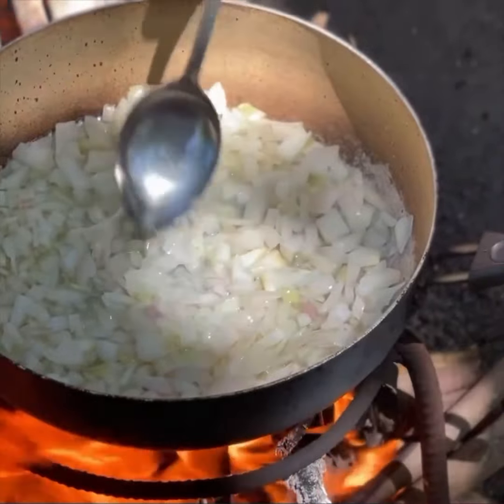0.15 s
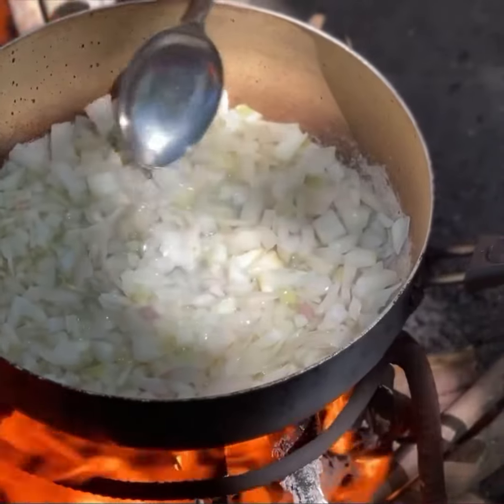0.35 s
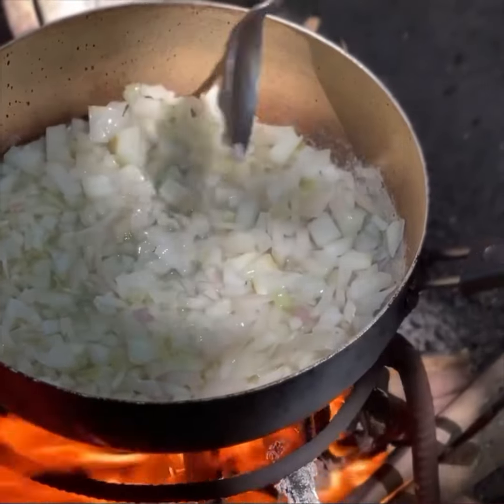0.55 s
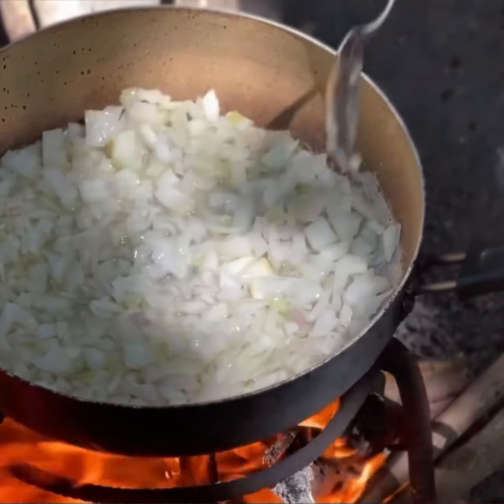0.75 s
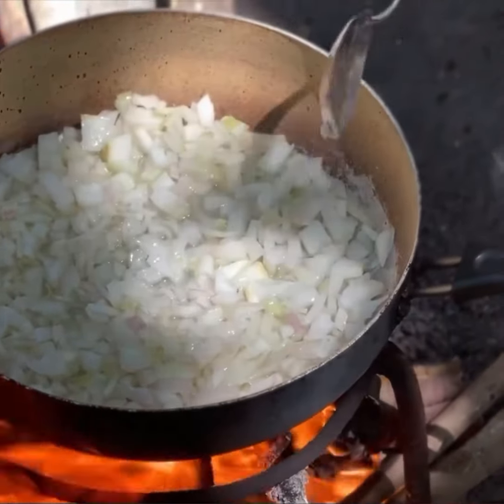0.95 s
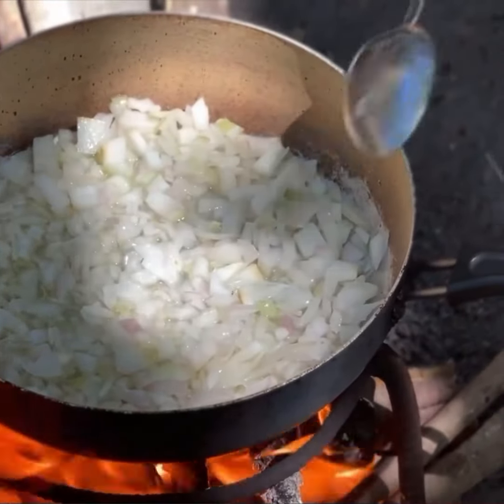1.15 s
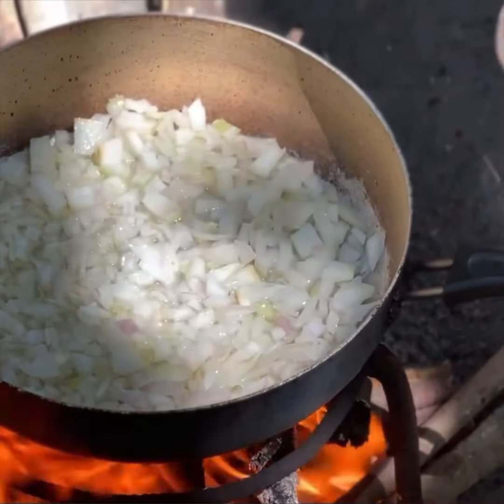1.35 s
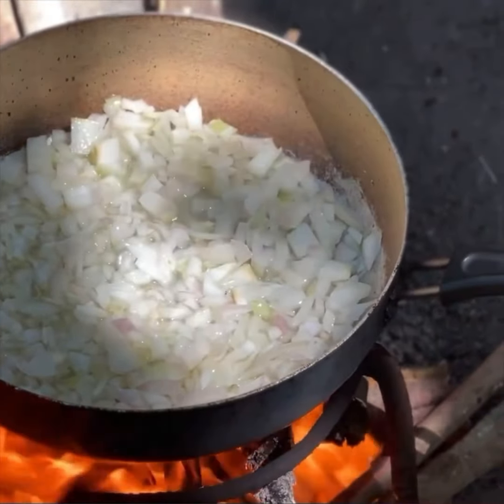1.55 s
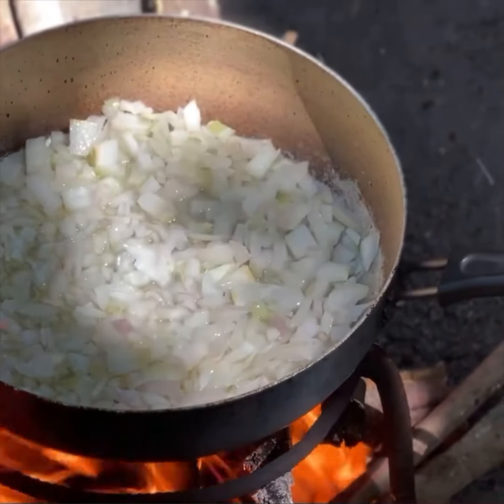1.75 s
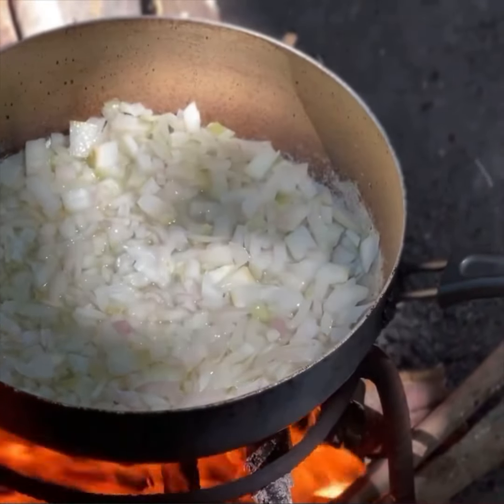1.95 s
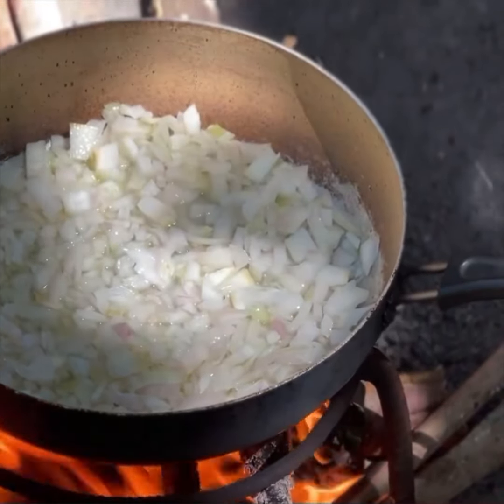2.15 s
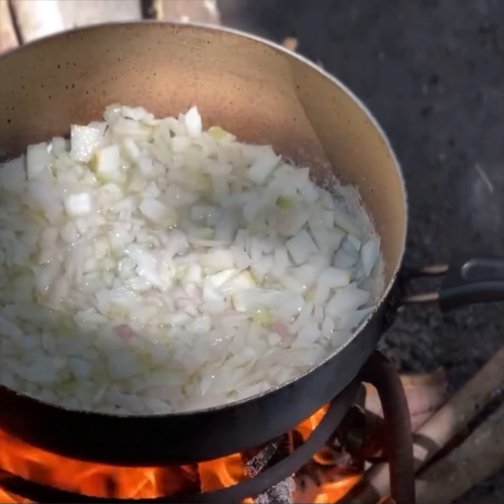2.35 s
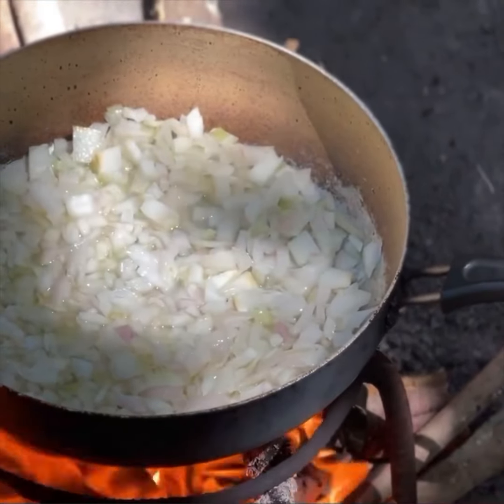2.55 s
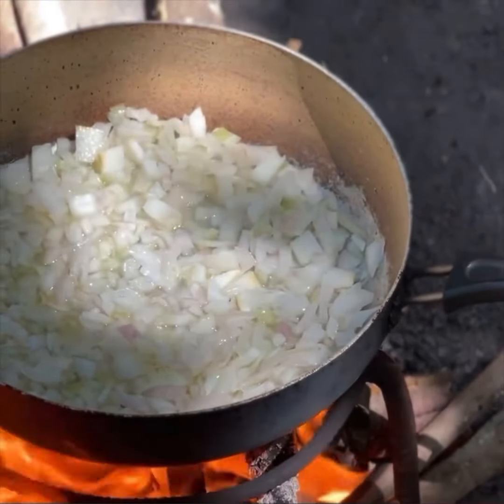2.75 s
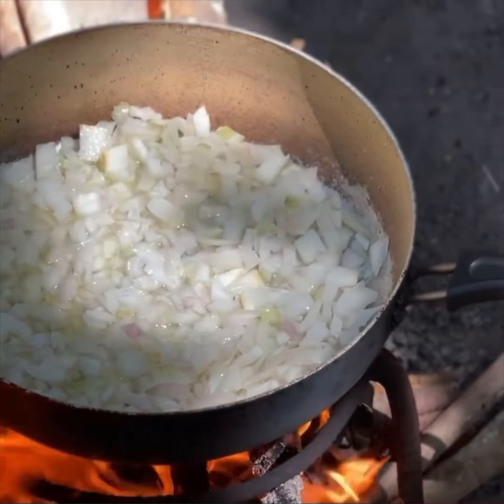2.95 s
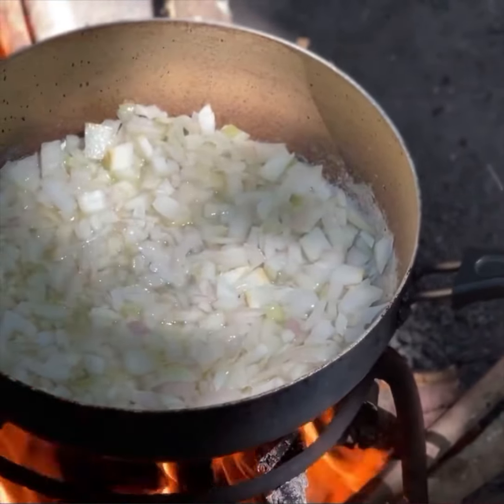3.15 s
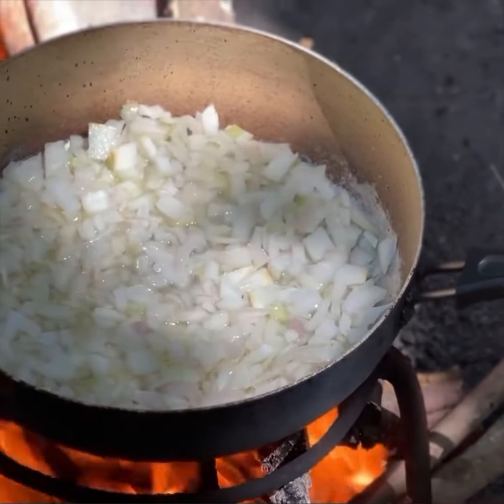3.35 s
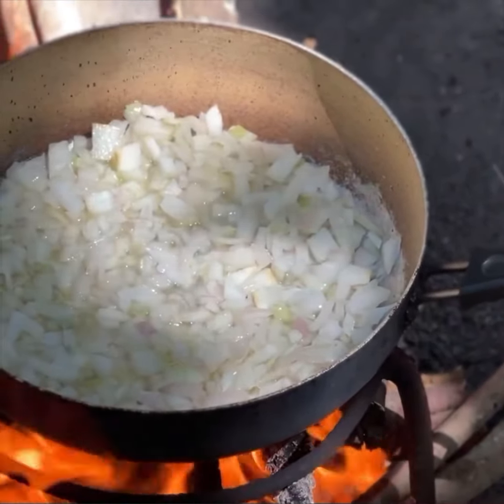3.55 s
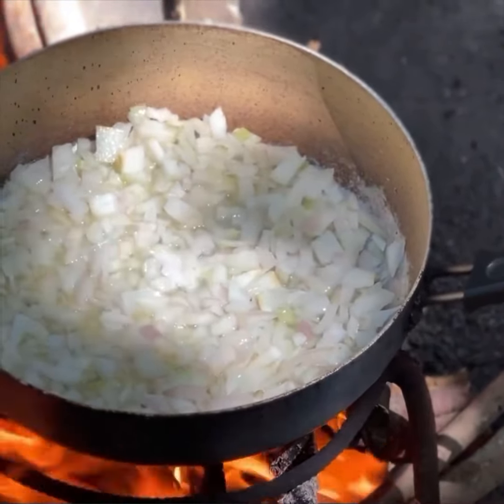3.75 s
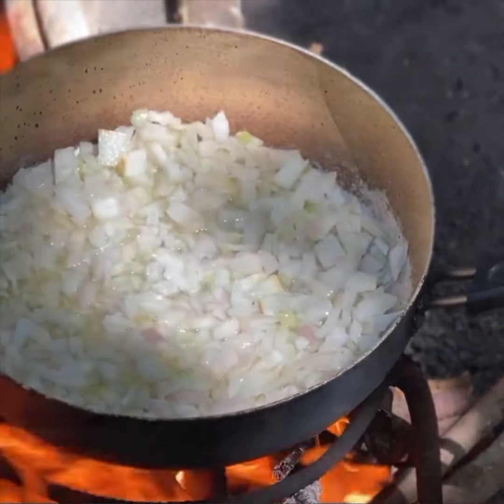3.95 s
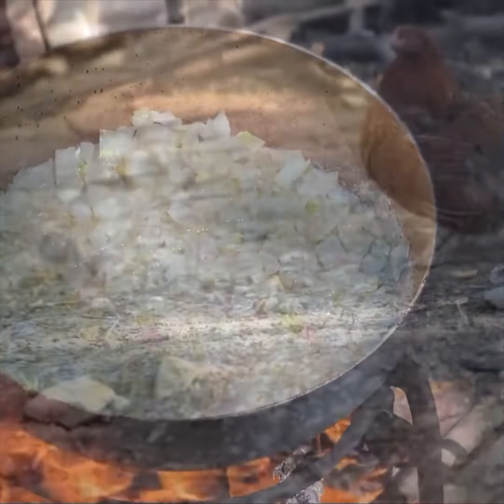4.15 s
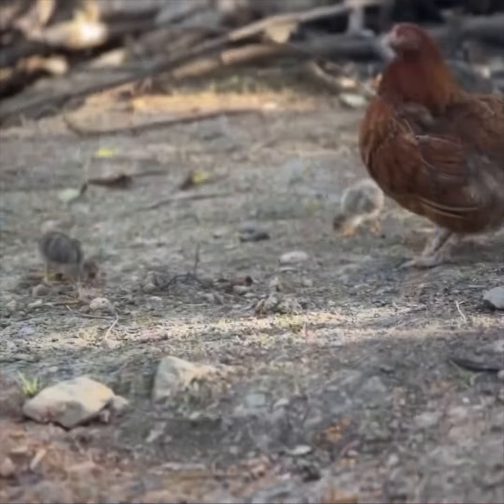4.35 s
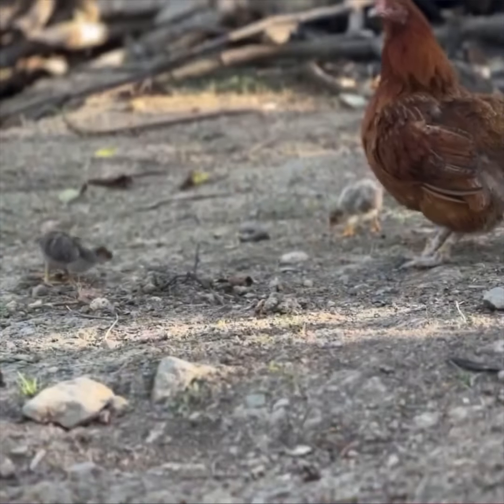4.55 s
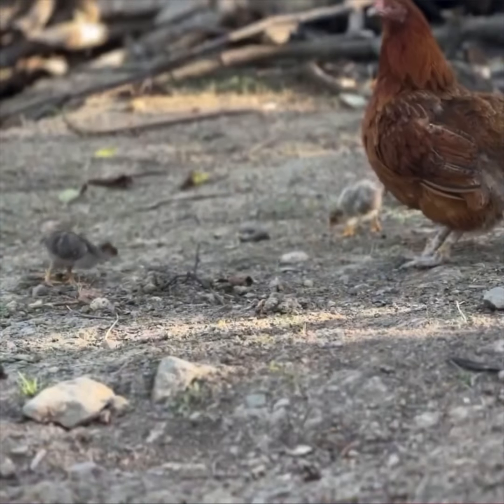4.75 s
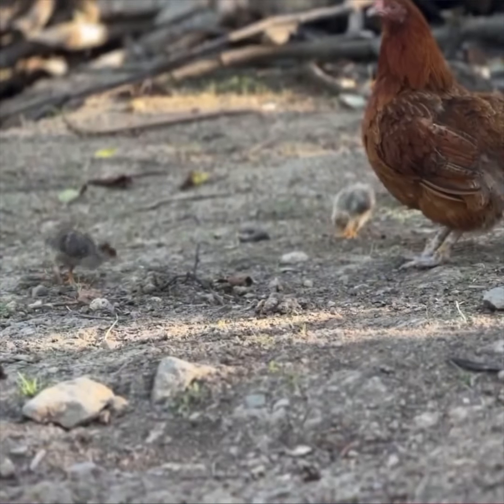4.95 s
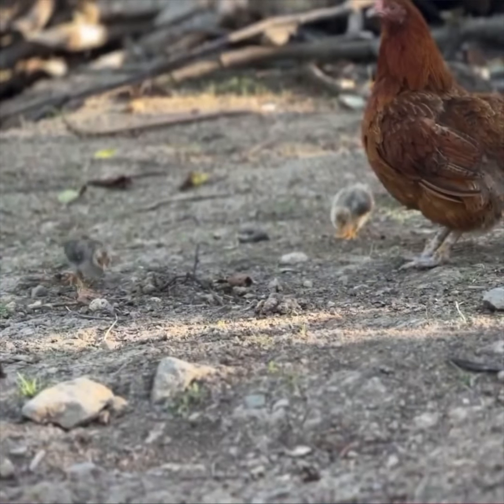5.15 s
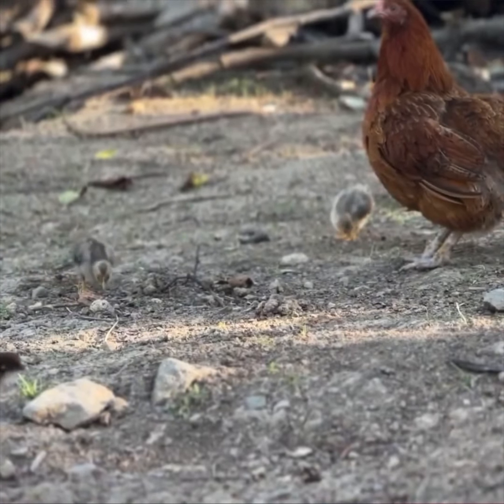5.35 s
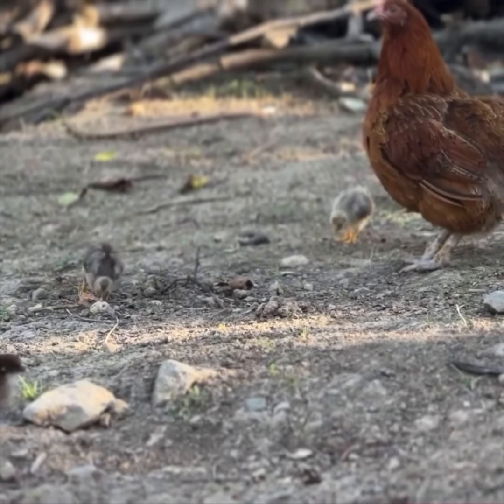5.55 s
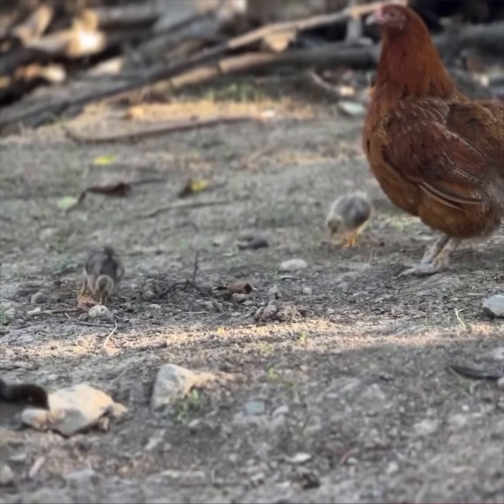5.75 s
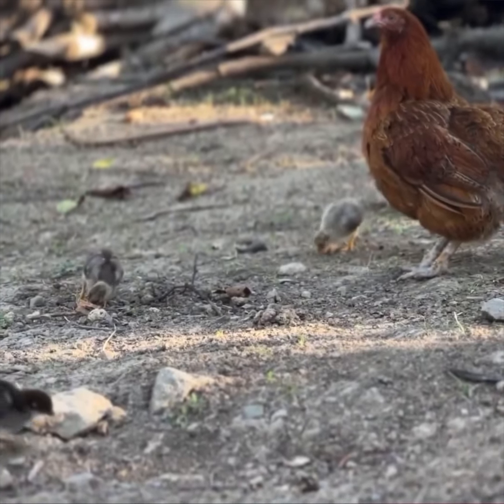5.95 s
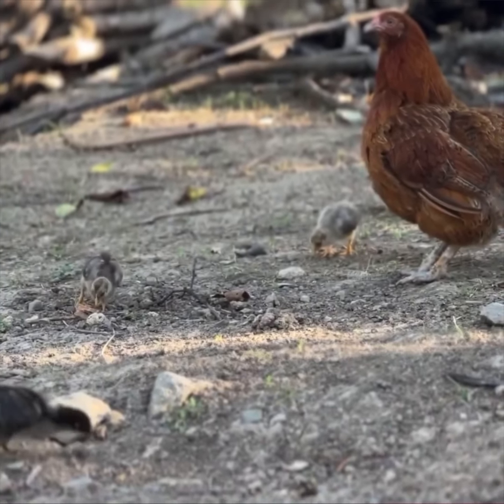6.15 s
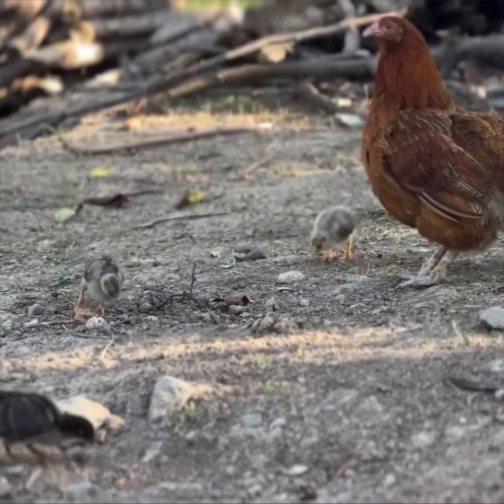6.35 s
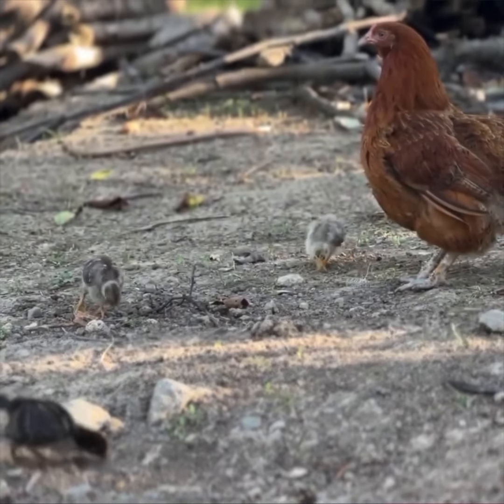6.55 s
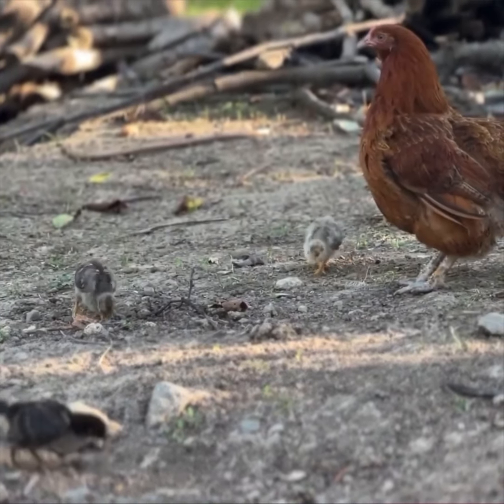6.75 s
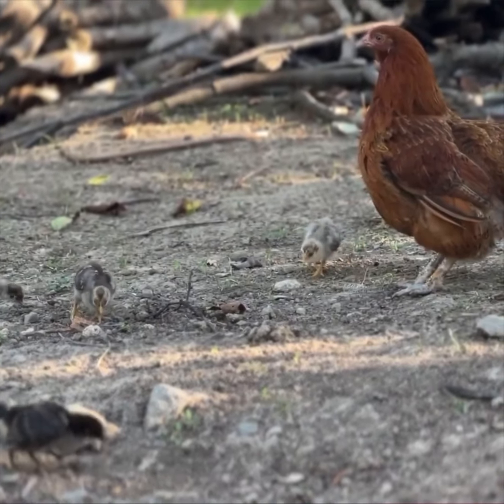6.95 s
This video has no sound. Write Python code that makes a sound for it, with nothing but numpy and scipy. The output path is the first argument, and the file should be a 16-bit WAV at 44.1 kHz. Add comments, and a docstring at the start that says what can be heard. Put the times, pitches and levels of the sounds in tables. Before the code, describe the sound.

Onions sizzle over a fire with spoon knocks and wind on the microphone, then a sudden change to a quiet yard with peeping chicks.

```python
"""Onion frying outdoors, then a yard with chicks.

Chopped onion sizzles over a wood fire as steam bubbles burst in the fat; air buffets the microphone.
A steel spoon is knocked clean on the rim, the pan rocks on its stand, the spoon is laid down and rings.
The scene changes abruptly to a quiet yard: chicks whistle short peeps, a low croak like a hen's
rattles once, a high hiss hangs behind."""
import sys
import numpy as np
from scipy import signal
from scipy.fft import rfft, irfft, next_fast_len
from scipy.io import wavfile
from scipy.ndimage import uniform_filter1d

SR = 44100
rng = np.random.default_rng(int(sys.argv[2]) if len(sys.argv) > 2 else 0)


def dump_mix(stems):
    """Bounce the given channels to the path in sys.argv[1] as a 16-bit WAV at rate SR."""
    frames = np.atleast_2d(stems).T  # one column per channel
    limited = np.clip(frames, -1, 1)  # hard clip at full scale
    pcm = np.round(limited * 32767).astype(np.int16)
    wavfile.write(sys.argv[1], SR, pcm)


N = 313110
TIME_S = np.arange(N) / SR
EVENT_TIME_S = TIME_S[:SR // 2]
SCENE_CHANGE_S = 4.193

# Spectral shapes: freq_hz, density_db
SIZZLE_SPECTRUM = [(1760, -31), (3000, -15.5), (3550, -7), (4100, -5.5), (5100, -2.5), (5450, -1),
                   (7700, -2.1), (8850, 0), (9900, -6.5), (10400, -5), (11700, -6), (12300, -11),
                   (13500, -12.5), (15600, -9.5), (16000, -7)]
SPATTER_SPECTRUM = [(410, -34), (700, -12.5), (973, -10), (1620, -1.5), (2770, -2.5), (3600, -1.5),
                    (4280, -7.5), (5000, -8), (6500, -20.5), (11000, -120)]
KNOCK_SPECTRUM = [(150, 2), (400, 3.5), (900, 0), (1500, 2), (2300, -5.5), (3800, -5.5), (5800, -1.5),
                  (8500, -4), (11000, -19), (16000, -17)]
CLINK_SPECTRUM = [(300, -11.5), (620, -7), (760, -12), (970, 0), (1090, -6), (1230, -1), (1480, -13),
                  (1780, 4), (2050, -7), (2350, 3.5), (2700, -3.5), (4600, -14), (8000, -36), (16000, -35)]
BUFFET_SPECTRUM = [(22, -15), (40, -3), (70, 2.5), (120, -5.5), (200, -14), (330, -27), (700, -46)]
FLAME_SPECTRUM = [(76, -21.5), (130, 0), (167, -1.5), (279, -1.5), (469, -8), (754, -14.5), (1200, -14),
                  (1560, -32), (2640, -120)]
THROAT_SPECTRUM = [(450, -11), (750, -6), (1000, 1.5), (1300, -11), (1700, -7), (2500, -18), (4000, -32)]
AIR_SPECTRUM = [(71, -23.5), (120, -1), (246, -6), (278, -10), (341, -7), (385, -12.5), (592, -13.5),
                (1460, -20.5), (2480, -19.5), (2930, -20.5), (3660, -24), (5410, -29), (7500, -28.5),
                (9210, -34.5), (16000, -46)]
HISS_SPECTRUM = [(6200, -39), (6800, -3.5), (7400, 5), (7800, 0.5), (8100, -14), (8700, -11), (9300, -36)]
# Stereo widths: freq_hz, side_gain_db
PAN_WIDTH = [(200, -18.5), (900, -8.5), (1400, -46), (2400, -63), (3500, -51), (4600, -68), (8200, -77),
             (9100, -24), (9800, 8), (10600, -40), (12000, -57), (15500, -40)]
YARD_WIDTH = [(150, -14.5), (500, -5), (1300, -0.5), (2500, -8), (3500, -11), (4500, -46), (7400, -43),
              (14000, -10)]

# Juice meeting hot fat: peak_s, lift_db
FLARES = [(.48, 1), (1.24, 3), (2.29, 1.5), (3.25, 1.3), (4.05, 1.5)]
# Bursting drops of fat: start_s, level_db, centre_hz
POPS = [(0.748, -5, 6000), (1.43, -0.5, 7000), (2.865, -7, 5000), (2.9545, -7, 7000), (3.445, 1.5, 7000),
        (3.775, -1, 8000)]
# Spoon on the rim: start_s, strength_db, t60_s
KNOCKS = [(0.8042, 6.5, 0.038), (0.8096, -7.5, 0.024), (1.038, 3.5, 0.06)]
# Modes of spoon and rim together: freq_hz, gain_db, t60_s
RIM_MODES = [(607, -11, 0.15), (1658, -13.5, 0.071), (2700, -7, 0.038), (4060, -34, 0.084),
             (4460, -3.5, 0.025), (4940, -1.5, 0.022), (5600, -27, 0.062), (6040, -3, 0.034),
             (7300, -22, 0.065), (8690, -5, 0.027), (8480, -8, 0.037)]
# Spoon laid down: start_s, impact_db, ring_db
CLINKS = [(1.960, -3.5, -3.5), (1.992, -10.5, -6.5), (2.073, -18, -23), (2.081, -18, -25),
          (2.324, -26, -22)]
# Modes of the free spoon: freq_hz, gain_db, t60_s
SPOON_MODES = [(1010, -32.5, 0.63), (1790, -29, 0.17), (2080, -30, 0.22), (2372, -42, 0.11),
               (2995, -13.5, 0.18), (3500, -29, 0.19), (4130, -23, 0.12)]
# Pan on its stand, later things on the ground: start_s, level_db, pitch_hz
BUMPS = [(0.737, -3.5, 310), (0.838, -1.5, 633), (0.8478, 7, 470), (0.861, 2, 538), (0.875, -6, 537),
         (1.063, 0.5, 417), (1.071, -2, 587), (1.078, 0, 497), (4.376, -19, 606), (5.833, -24.5, 606)]
# Short gritty sounds, scrapes and one light peck-like tap: start_s, length_s, level_db, centre_hz, width_hz
GRITTY_SOUNDS = [(0.731, 0.018, -19.5, 1520, 980), (2.115, 0.15, -35, 877, 190),
                 (5.831, .009, -41, 750, 900)]

# Light breeze: time_s, strength_db
BREEZE = [(0, -32), (1.75, -36.5), (3.0, -31), (3.7, -35.5), (4.5, -37.5), (5.0, -35), (5.45, -40.5),
          (6.1, -48), (6.6, -34), (7.1, -30.5)]
# Gusts on top of it: start_s, hold_s, strength_db, eddy_hz
GUSTS = [(.11, 0.06, -30, 119), (.59, 0.42, -30.5, 111), (1.93, 0.17, -29.5, 150), (2.13, 0.14, -14, 130),
         (2.33, .11, -17, 110), (2.69, 0.21, -21.5, 210), (3.28, 0.052, -24, 150), (3.97, .18, -20.5, 320),
         (5.38, 0.071, -29.5, 100), (5.575, .04, -25.5, 150), (6.72, .36, -35, 170)]
# Strong single eddies: start_s, level_db, start_hz
EDDIES = [(1.083, -17, 103), (1.45, -15, 148), (2.059, -15, 170), (2.129, -7.5, 185.4), (2.246, -5.5, 105),
          (2.538, -18, 228), (5.601, -20, 175)]
EDDY_S = 0.0343

# Near chicks: start_s, length_s, start_hz, end_hz, level_db
PEEPS = [(4.23, 0.032, 2700, 3630, -42), (4.245, 0.05, 2960, 2610, -33.5),
         (4.835, 0.047, 3300, 2620, -36.5), (4.982, 0.045, 3200, 2600, -37), (5.206, .04, 2750, 3670, -41),
         (6.017, 0.042, 3100, 2610, -36.5), (6.252, 0.029, 2650, 3520, -40), (6.662, .026, 3100, 3600, -47),
         (6.749, 0.04, 3200, 2700, -40), (6.855, .054, 3380, 2660, -36.5)]
# Low rattle: start_s, length_s, level_db
CROAK = (4.379, 0.087, -41)
# Distant tone: start_s, length_s, pitch_hz, level_db
FAR_TONE = (0.015, .125, 994, -38.5)


def frying():
    """Fine steam bursts hiss, bubbles fizz; coarser bursts between the onion pieces spatter lower."""
    sizzle_db, spatter_db = heat()
    seething = from_db(.45 * drift(6) + .35 * drift(22))
    fizz = bubbles(per_s=6500, spread_db=2.8, q=24, pitches=56)
    spits = from_db(-17) * bursts(per_s=160, spread_db=2)
    fine = rms_one(fizz + spits + from_db(2) * bursts(per_s=22000, spread_db=2.4))
    coarse = rms_one(fizz + from_db(3) * bursts(per_s=9000, spread_db=2))
    sizzle = from_db(sizzle_db) * colour(fine, SIZZLE_SPECTRUM)
    spatter = from_db(spatter_db) * colour(coarse, SPATTER_SPECTRUM)
    return stereo(seething * (sizzle + spatter), PAN_WIDTH)


def heat(sizzle_db_per_s=0.82, spatter_db_per_s=0.67, flare_width_s=0.056):
    """The pan heats up: sizzle and spatter climb steadily, with brief flares."""
    flare_db = sum(db * np.exp(-((TIME_S - peak_s) / flare_width_s) ** 2) for peak_s, db in FLARES)
    sizzle_db = -26.5 + sizzle_db_per_s * TIME_S + flare_db
    spatter_db = -35 + spatter_db_per_s * TIME_S + 0.3 * flare_db
    return sizzle_db, spatter_db


def bubbles(per_s, spread_db, q, pitches):
    """Each burst rings at one of many pitches; each pitch wavers in level."""
    grains = bursts(per_s, spread_db)
    pitch_index = rng.integers(0, pitches, N)
    out = 0
    for k, hz in enumerate(np.geomspace(1000, 16000, pitches)):
        ring = resonance(grains * (pitch_index == k) + 1e-18, hz, hz / q)
        out = out + ring * from_db(1.1 * drift(22))
    return rms_one(out)


def pops():
    """Larger drops of fat burst with a tick."""
    out = np.zeros(N)
    for start_s, db, hz in POPS:
        tick = rng.standard_normal(SR // 2) * decay(t60_s=0.0025)
        add(out, start_s, from_db(db) * resonance(tick, hz, width_hz=4500))
    return out


def spoon_knocks():
    """Held against the rim, the spoon clacks and is soon damped."""
    clack, ring = np.zeros((2, N))
    for start_s, db, t60_s in KNOCKS:
        envelope = decay(t60_s) + from_db(-16) * decay(0.19)
        add(clack, start_s, from_db(db - 2) * rng.standard_normal(SR // 2) * envelope)
        for hz, mode_db, mode_t60_s in RIM_MODES:
            gain = from_db(db + mode_db + rng.normal(0, 3.3)) * rng.choice([-1, 1])
            add(ring, start_s, gain * np.sin(2 * np.pi * hz * EVENT_TIME_S) * decay(mode_t60_s))
    return colour(clack, KNOCK_SPECTRUM) + ring


def spoon_clinks():
    """Laid down, the spoon bounces; each bounce tops up its ringing in phase."""
    clink, ring = np.zeros((2, N))
    envelope = decay(0.022) + from_db(-20.5) * decay(0.4)
    for start_s, impact_db, ring_db in CLINKS:
        add(clink, start_s, from_db(impact_db) * rng.standard_normal(SR // 2) * envelope)
        for hz, mode_db, t60_s in SPOON_MODES:
            mode = np.sin(2 * np.pi * hz * (start_s + EVENT_TIME_S))
            add(ring, start_s, from_db(ring_db + mode_db) * mode * decay(t60_s))
    return colour(clink, CLINK_SPECTRUM) + ring


def bumps():
    """A soft contact swells over a cycle and rings briefly in a low mode and a weaker upper one."""
    out = np.zeros(N)
    for start_s, db, hz in BUMPS:
        phase = 2 * np.pi * hz * EVENT_TIME_S
        modes = np.sin(phase) + 0.17 * np.sin(1.55 * phase)
        attack = 1 - np.exp(-2 * hz * EVENT_TIME_S)
        add(out, start_s, from_db(db) * modes * attack * decay(t60_s=0.023))
    return out


def gritty_sounds(flicker_db=1):
    """Scrapes and one light peck-like tap: uneven grains excite one broad resonance."""
    out = np.zeros(N)
    grains = bursts(per_s=8200, spread_db=3)[0] * from_db(flicker_db * drift(56))
    for start_s, length_s, db, hz, width_hz in GRITTY_SOUNDS:
        first, count = int(start_s * SR), int(length_s * SR)
        grit = grains[first:first + count]
        for _ in range(2):
            grit = resonance(grit, hz, 0.73 * width_hz)
        swell = np.sin(np.linspace(0, np.pi, count))
        add(out, start_s, from_db(db) * rms_one(grit * swell))
    return out


def wind():
    """Lumpy low turbulence on the microphone swells with each gust."""
    airflow_db = airflow(flutter_db=2.6)
    lumps = colour(bursts(per_s=330, spread_db=4), BUFFET_SPECTRUM)
    lumps = signal.sosfilt(signal.butter(4, 42, "high", fs=SR, output="sos"), lumps)
    lumps = stereo(lumps, [(50, -15), (200, -13)])
    running_rms = np.sqrt(uniform_filter1d(np.mean(lumps ** 2, axis=0), size=3500) + 1e-9)
    return from_db(airflow_db - 2) * lumps / running_rms


def airflow(flutter_db, rise_db_per_s=172, fall_db_per_s=262):
    """Air strength in dB: gusts rise, hold and fall on top of the breeze; the sum flutters."""
    power = from_db(along_time(BREEZE)) ** 2
    for start_s, hold_s, db, _ in GUSTS:
        before_s = np.maximum(start_s - TIME_S, 0)
        after_s = np.maximum(TIME_S - start_s - hold_s, 0)
        power += from_db(db - rise_db_per_s * before_s - fall_db_per_s * after_s) ** 2
    return 10 * np.log10(power) + flutter_db * drift(14)


def eddies():
    """A passing eddy thumps on the microphone and falls in pitch."""
    out = np.zeros(N)
    progress = np.linspace(0, 1, int(EDDY_S * SR))
    for start_s, db, start_hz in EDDIES + shed_eddies():
        phase = 2 * np.pi * np.cumsum(start_hz * np.exp(-.9 * progress)) / SR
        add(out, start_s, from_db(db) * np.sin(phase) * np.sin(np.pi * progress))
    return out


def shed_eddies(per_s=22, relative_db=-3):
    """A gust sheds a loose train of smaller eddies while it holds; rows as in EDDIES."""
    rows = []
    for start_s, hold_s, db, hz in GUSTS:
        jitter = rng.uniform(-1, 1, (32, 3))
        times_s = np.arange(start_s, start_s + hold_s - EDDY_S / 2, 1 / per_s)
        for at_s, (late, strong, high) in zip(times_s, jitter):
            rows.append((at_s + late * EDDY_S / 2, db + relative_db + 3 * strong, hz * 2 ** (.34 * high)))
    return rows


def flames():
    """The wood fire flutters under the pan."""
    return from_db(-37.5 + 1.86 * drift(6.2)) * stereo(colour(noise(), FLAME_SPECTRUM), PAN_WIDTH)


def chicks(full_effort_db=-33.5, octave_loss_db_per_db=6.4):
    """Peeps slide up or down; a forced one gains an octave overtone."""
    out = np.zeros(N)
    for start_s, length_s, start_hz, end_hz, db in PEEPS + far_peeps():
        octave_db = -9 - octave_loss_db_per_db * max(full_effort_db - db, 0)
        add(out, start_s, from_db(db) * whistle(length_s, start_hz, end_hz, octave_db))
    return out


def far_peeps(per_s=3, length_s=.035, pitch_hz=3100, level_db=-54):
    """Faint falling peeps scattered through the yard; rows as in PEEPS."""
    jitter = rng.uniform(-1, 1, (24, 3))
    times_s = np.arange(SCENE_CHANGE_S + 1 / per_s, N / SR, 1 / per_s)
    rows = []
    for at_s, (late, high, strong) in zip(times_s, jitter):
        start_hz, end_hz = pitch_hz * (1 + .089 * high), pitch_hz * (.81 + .1 * high)
        rows.append((at_s + late / 2 / per_s, length_s, start_hz, end_hz, level_db + 2 * strong))
    return rows


def whistle(length_s, start_hz, end_hz, octave_db):
    """A quavering near sine swells and fades; its glide quickens toward the end."""
    progress = np.linspace(0, 1, int(length_s * SR))
    quaver = rms_one(signal.lfilter([1], [1, -.98], rng.standard_normal(len(progress))))
    glide_hz = start_hz + (end_hz - start_hz) * (progress + progress ** 2) / 2
    phase = 2 * np.pi * np.cumsum(glide_hz * (1 + .012 * quaver)) / SR
    swell = np.abs(np.sin(np.pi * progress ** 1.57)) ** 0.43 * from_db(quaver)
    return (np.sin(phase) + from_db(octave_db) * np.sin(2 * phase)) * swell


def croak(puffs_per_s=55, puff_t60_s=.022, breath_db=-11):
    """Hen-like rattle: separate puffs of air pass through the throat's resonances."""
    start_s, length_s, db = CROAK
    time_s, puffs = TIME_S[:int(length_s * SR)], np.zeros(N)
    since_puff_s = time_s % (1 / puffs_per_s)
    opening = from_db(-60 * since_puff_s / puff_t60_s) + from_db(breath_db)
    swell = np.sqrt(np.sin(np.pi * time_s / length_s))
    breath = rng.standard_normal(N)[:len(time_s)]
    add(puffs, start_s, rms_one(breath * opening * swell))
    return from_db(db) * colour(puffs, THROAT_SPECTRUM)


def far_tone():
    """One faint, short tone far off."""
    start_s, length_s, hz, db = FAR_TONE
    out = np.zeros(N)
    add(out, start_s, from_db(db) * whistle(length_s, hz, hz, octave_db=-30))
    return out


def yard():
    """Soft outdoor air and a narrow hiss, as of distant insects."""
    air = from_db(-42.5 + .5 * drift(4)) * colour(noise(), AIR_SPECTRUM)
    hiss = from_db(-48.5 + drift(25) + .7 * drift(3.4)) * colour(noise(), HISS_SPECTRUM)
    return stereo(air + hiss, YARD_WIDTH)


def outdoors(x, wet_db, t60_s):
    """Adds sparse dull reflections from ground and walls, different at each ear."""
    echoes = rng.standard_normal((2, SR // 2)) * (rng.random((2, SR // 2)) < .03) * decay(t60_s)
    echoes = signal.lfilter([1], [1, -.5], echoes)
    echoes /= np.sqrt(np.sum(echoes ** 2, axis=1, keepdims=True))
    return x + from_db(wet_db) * signal.fftconvolve(x[None], echoes, axes=1)[:, :N]


def bursts(per_s, spread_db):
    """Two rows of random impulses: many small, a few large."""
    sizes = from_db(spread_db * np.minimum(rng.exponential(1, (2, N)), 6))
    signs = rng.choice([-1, 1], (2, N))
    return rms_one(sizes * signs * (rng.random((2, N)) < per_s / SR))


def noise():
    """Two rows of white noise."""
    return rng.standard_normal((2, N))


def drift(rate_hz):
    """Slow random curve, unit RMS."""
    hop, settle = 40, 2000
    pole = np.exp(-2 * np.pi * hop * rate_hz / SR)
    white = rng.standard_normal(N // hop + settle + 2)
    slow = signal.lfilter([1], [1, -2 * pole, pole ** 2], white)[settle:]
    return np.interp(np.arange(N) / hop, np.arange(len(slow)), rms_one(slow))


def colour(x, spectrum):
    """Minimum-phase filter, 30 dB per octave skirts; white noise keeps its power."""
    size = 2 * next_fast_len(N // 2 + 8192)
    hz, db = np.transpose(spectrum)
    octaves = np.log2(np.maximum(np.arange(size // 2 + 1) * SR / size, 1))
    points = np.log2(hz)
    outside = np.abs(octaves - np.clip(octaves, points.min(), points.max()))
    gain = rms_one(from_db(np.interp(octaves, points, db) - np.minimum(30 * outside, 60)))
    cepstrum = irfft(np.log(gain))
    cepstrum[1:size // 2] *= 2
    cepstrum[size // 2 + 1:] = 0
    return irfft(rfft(x, size) * np.exp(rfft(cepstrum)))[..., :N]


def resonance(x, hz, width_hz):
    """Two-pole band-pass, unit peak gain."""
    radius = np.exp(-np.pi * width_hz / SR)
    feedback = [1, -2 * radius * np.cos(2 * np.pi * hz / SR), radius ** 2]
    return signal.lfilter(np.array([1, 0, -1]) * (1 - radius ** 2) / 2, feedback, x)


def stereo(pair, width):
    """Two unrelated rows as centre and side; side gain depends on frequency."""
    hz, db = np.transpose(width)
    size = next_fast_len(N)
    bins_hz = np.arange(1, size // 2 + 2) * SR / size
    gain = from_db(np.interp(np.log(bins_hz), np.log(hz), db))
    side = irfft(rfft(pair[1], size) * gain, size)[:N]
    return np.array([pair[0] + side, pair[0] - side])


def along_time(curve):
    """A (time_s, value) curve at every sample."""
    return np.interp(TIME_S, *np.transpose(curve))


def decay(t60_s):
    """Exponential envelope, 0.5 s long."""
    return from_db(-60 * EVENT_TIME_S / t60_s)


def add(out, start_s, sound):
    """Mixes a sound in place."""
    first = max(int(start_s * SR), 0)
    out[first:first + len(sound)] += sound[:N - first]


def from_db(db):
    """Decibels to gain."""
    return 10 ** (np.asarray(db) / 20)


def rms_one(x):
    """Scales to unit power."""
    return x / np.sqrt(np.mean(x ** 2) + 1e-20)


def scene(change_s=0.021):
    """The fireside gives way abruptly to the yard; wind runs through both."""
    fireside = np.clip((SCENE_CHANGE_S - TIME_S) / change_s, 0, 1)
    contacts = spoon_knocks() + spoon_clinks() + bumps() + gritty_sounds()
    contacts = outdoors(contacts, wet_db=-19.5, t60_s=0.053) * from_db([[.6], [-.6]])  # slightly left
    beds = fireside * (frying() + flames()) + (1 - fireside) * yard()
    near = beds + wind() + eddies() + pops() + contacts
    return near + outdoors(chicks() + far_tone() + croak(), wet_db=-11.5, t60_s=0.17)


def record(dry, threshold_db=8, release_db_per_s=110, cutoff_hz=15800):
    """Limiter ducking after the loudest knocks, soft clip, low-pass."""
    over_db = np.maximum(20 * np.log10(np.abs(dry).max(axis=0) + 1e-9) - threshold_db, 0)
    release_db = release_db_per_s * TIME_S
    held_db = np.maximum.accumulate(over_db + release_db) - release_db
    limited = dry * from_db(-signal.lfilter([.005], [1, -.995], held_db))
    rounded = limited / (1 + limited ** 6) ** (1 / 6)
    return signal.sosfilt(signal.ellip(10, .2, 70, cutoff_hz, fs=SR, output="sos"), rounded)


dry = scene()
out = record(dry)
dump_mix(out)
```